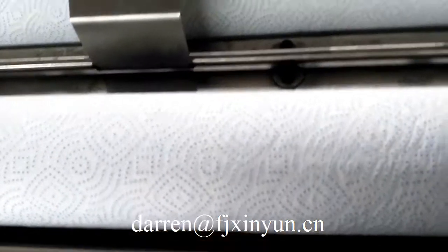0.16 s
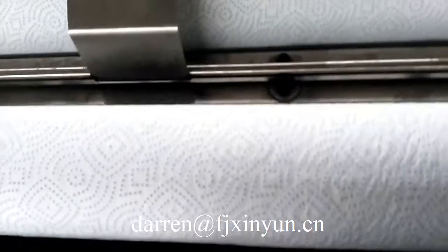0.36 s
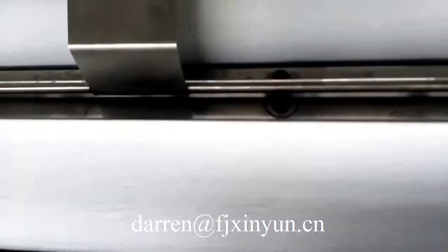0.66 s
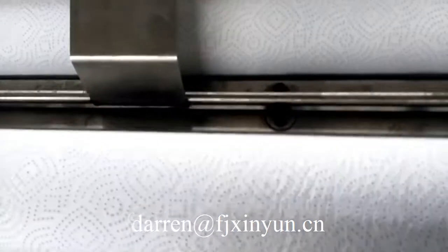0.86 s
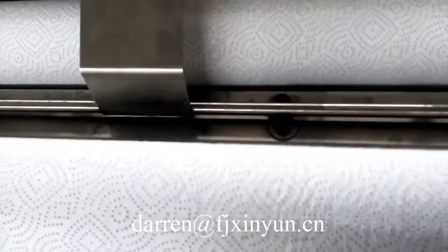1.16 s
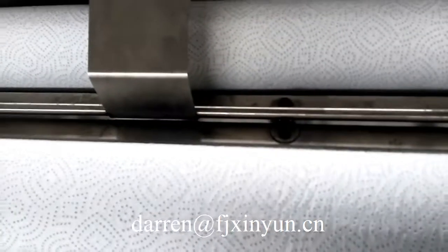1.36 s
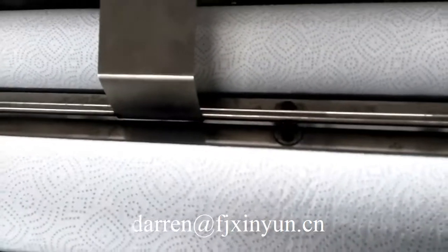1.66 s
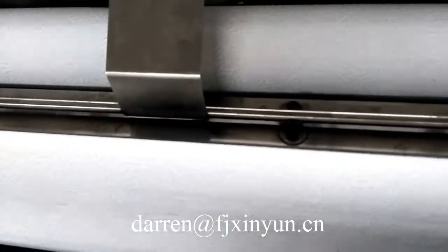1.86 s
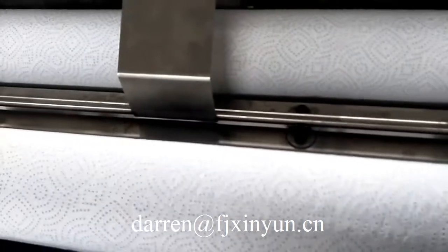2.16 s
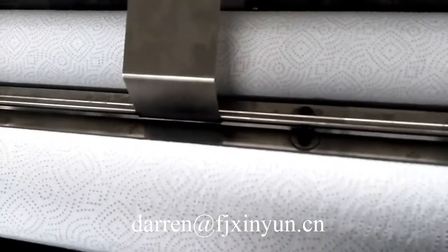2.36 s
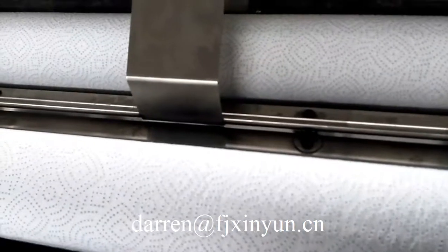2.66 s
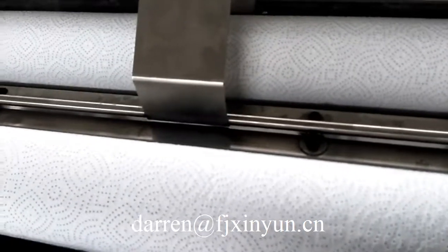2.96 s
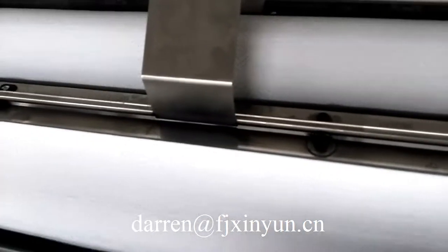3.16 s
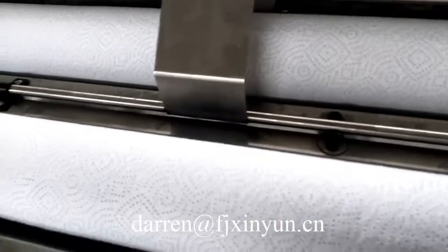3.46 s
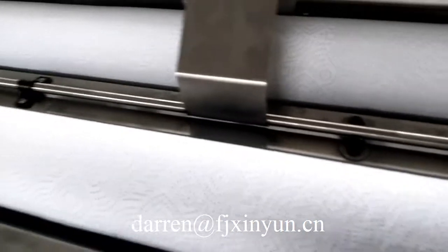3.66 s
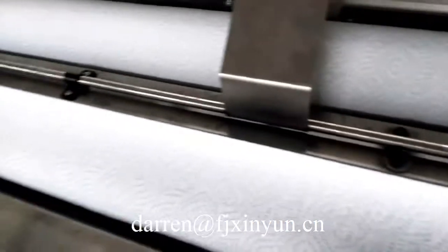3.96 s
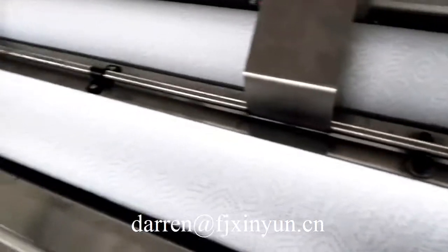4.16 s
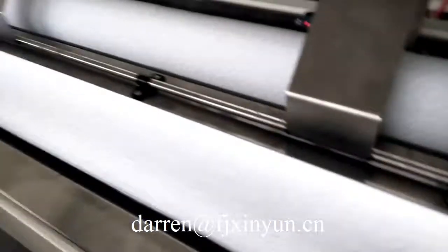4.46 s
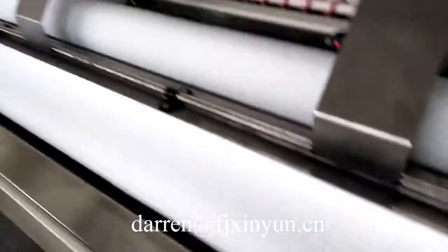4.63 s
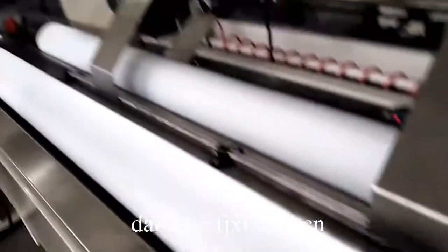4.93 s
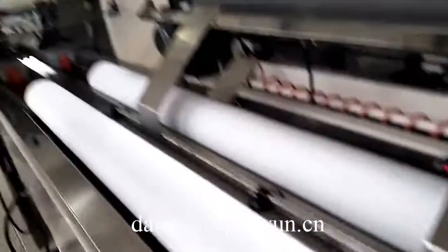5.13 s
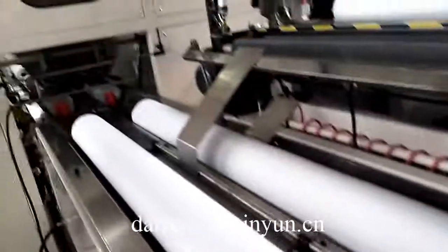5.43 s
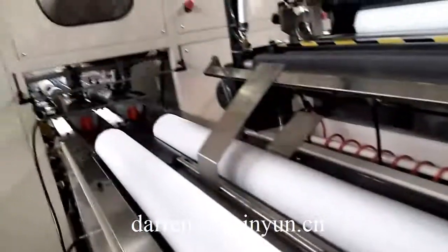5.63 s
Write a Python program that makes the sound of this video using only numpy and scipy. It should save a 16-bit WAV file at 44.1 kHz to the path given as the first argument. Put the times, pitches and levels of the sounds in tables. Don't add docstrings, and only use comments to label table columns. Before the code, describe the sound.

A tissue machine already runs at full speed at 0 s and never stops. Its thick, uneven roar combines low-mid frame rumble, roller noise, paper hiss and thin high air leaks. A low gear hum grows through the first 1.4 s, throbs nearly five times a second, stays strong until about 3.2 s, fades around 4.6 s and returns near 5 s; its octave surges irregularly. A harmonic-rich saw whine near 900 Hz flutters above, briefly slowing, dipping and softening around 0.5, 1.8, 3.0 and 4.3 s, with another cut beginning at about 5.6 s. Ticks, thuds and faint air puffs cycle just over five times a second, ticks growing clearer until 4.9 s, then receding. From about 5 s the hand-held stereo perspective turns brighter and airier, with less deep rumble. A roll clanks dully into a metal chute at 5.5 s, followed by two quick bounces at 5.63 and 5.68 s. The hall adds short reverberation; the loudest peaks slightly saturate.

```python
import sys
import numpy as np
from scipy import signal
from scipy.fft import rfft, irfft, next_fast_len
from scipy.io import wavfile
from scipy.ndimage import uniform_filter1d, map_coordinates

SR = 44100
rng = np.random.default_rng(int(sys.argv[2]) if len(sys.argv) > 2 else 0)


def pcm_store(signal):
    levels = np.round(np.clip(np.atleast_2d(signal), -1, 1) * 32767)
    wavfile.write(sys.argv[1], SR, levels.astype(np.int16).T)


def makeup_ratio(level_db):
    decades = np.asarray(level_db, float) / 20
    return 10 ** decades


N = 255339


def unit(x):
    return x / np.sqrt(np.mean(x ** 2) + 1e-20)


def along(points, hz):
    f, v = np.transpose(points)
    return np.interp(np.log(hz + 1), np.log(f + 1), v)


def curves(rows):
    s, *cols = np.transpose(rows)
    return [np.interp(np.arange(N) / SR, s, c) for c in cols]


def wobble(rate_hz):
    knots = rng.standard_normal(int(N * rate_hz / SR) + 4)
    return map_coordinates(knots, [np.arange(N) * rate_hz / SR])


def filtered(x, response):
    m = next_fast_len(N + SR // 4)
    return irfft(rfft(x, m) * response(np.fft.rfftfreq(m, 1 / SR)), m)[..., :N]


def peak(hz, width_hz):
    return lambda f: 1j * f * width_hz / (hz * hz - f * f + 1j * f * width_hz)


def facing(db, gain_db, late):
    # time in seconds, share turned 0-1.
    turning = [
        (0, 0),
        (.5, 0.14),
        (1.9, 0.2),
        (2.4, 0.43),
        (4.1, 0.36),
        (4.6, .55),
        (5.1, .65),
        (5.35, 0.92),
        (5.79, 0.94),
    ]
    return db + gain_db * np.clip(curves(turning)[0], 0, 1.2) ** late


def ports(pair):
    # frequency in Hz, left-right likeness -1 to 1.
    likeness = [(60, 0.88), (110, 0.88), (200, 0.92), (370, 0.86), (670, 0.29), (1230, -0.32),
                (2250, -0.21), (4120, -0.33), (7550, 0.23), (13800, 1)]

    def angle(hz):
        return np.arccos(np.clip(along(likeness, hz), -1, 1)) / 2

    mid, side = filtered(pair, lambda hz: np.array([np.cos(angle(hz)), np.sin(angle(hz))]))
    return np.array([mid + side, mid - side])


def rush(spectrum, patchy_db):
    z = signal.stft(rng.standard_normal((2, N)), nperseg=512)[2]
    field = uniform_filter1d(rng.standard_normal(z.shape[1:]), size=5, axis=0)
    field = uniform_filter1d(field, size=12, axis=1)
    pair = signal.istft(z * makeup_ratio(patchy_db * unit(field)), nperseg=512)[1][:, :N]
    return unit(filtered(pair, lambda hz: makeup_ratio(along(spectrum, hz))))


def roar():
    # frequency in Hz, density in dB per Hz.
    frame_spectrum = [(15, -60), (25, -56), (42, -22), (61, -7.5), (113, -8), (155, -4.5), (247, -3),
                      (310, -1.5), (358, -1.5), (518, -6), (632, -14), (750, -15.5), (980, -36),
                      (1650, -120)]
    roller_spectrum = [(350, -69), (600, -7.5), (733, -16), (825, -5), (900, 0), (969, -1), (1190, 0.5),
                       (1360, -8), (1700, -11), (2210, -15), (3740, -120)]
    web_spectrum = [(820, -3), (1400, -6.5), (2040, -8.5), (2700, 2), (3360, -7.5), (4560, -7.5),
                    (5540, -14.5), (5800, -33.5), (6470, -31), (6600, -40), (8580, -72), (14500, -120)]
    air_spectrum = [(3650, -35), (6200, -3.5), (6720, -12.5), (7000, -7.5), (8750, -3.5), (9490, -5),
                    (10300, -4.5), (10900, -14), (11500, -8), (11900, 2), (12400, -4.5), (13200, -35),
                    (13600, -6), (14300, -10)]

    frame_db = facing(db=-15, gain_db=-2.6, late=.39) + .8 * wobble(4) + .7 * wobble(17)
    frame = makeup_ratio(frame_db) * rush(frame_spectrum, patchy_db=3)
    bass = filtered(frame, lambda hz: 1 / (1 + (hz / 110) ** 4))
    frame = frame + (makeup_ratio(facing(db=.1, gain_db=-7, late=10)) - 1) * bass

    rollers_db = facing(db=-26, gain_db=7.3, late=1.1) + 1.2 * wobble(4) + .8 * wobble(9)
    rollers = makeup_ratio(rollers_db) * rush(roller_spectrum, patchy_db=2.2)
    web_db = facing(db=-22.5, gain_db=-4, late=1.75) + .6 * wobble(3) + .6 * wobble(7)
    web = makeup_ratio(web_db) * rush(web_spectrum, patchy_db=.8)
    air_db = facing(db=-34, gain_db=8, late=6.7) + .9 * wobble(4)
    air = makeup_ratio(air_db) * rush(air_spectrum, patchy_db=1.3)
    return frame + rollers + web + air


def drones():
    # frequency in Hz, width in Hz, level in dB.
    drives = [(299.2, 1.5, -28), (390, 16, -27), (506, 8, -31), (1147, 14, -38), (1269, 8, -41),
              (9038, 8, -52)]
    out = np.zeros((2, N))
    for hz, width_hz, db in drives:
        out += makeup_ratio(db) * unit(filtered(rng.standard_normal((2, N)), peak(hz, width_hz)))
    return out


def gearbox():
    # time in seconds, level in dB.
    hum = [(0, -45), (.3, -34.5), (.9, -27), (1.4, -20), (2.3, -20), (3.2, -21), (3.6, -29), (4.1, -32),
           (4.6, -50), (5.1, -28), (5.79, -26.5)]
    # time in seconds, level in dB.
    surges = [(.12, -20), (.5, -20), (.88, -17.5), (1.051, -23), (1.28, -18.5), (1.52, -29), (1.82, -20.5),
              (2.501, -45), (2.751, -23), (3.049, -15.5), (3.3, -20.5), (3.65, -21), (3.95, -15),
              (4.2, -24), (4.471, -21), (4.76, -22), (5.22, -16), (5.35, -24), (5.6, -23.5), (5.75, -21)]
    mesh_hz, twin_hz, twin_in_step_s = 159.03, 168.93, .013
    wheel_hz, wheel_peak_s, wheel_depth = 4.65, 1.195, .39
    octave_db, surge_s = -37.5, .11

    t = np.arange(N) / SR
    mesh_db, = curves(hum)
    throb = 1 + wheel_depth * np.cos(2 * np.pi * wheel_hz * (t - wheel_peak_s))
    mesh = throb * makeup_ratio(mesh_db + 4.5) * np.sin(2 * np.pi * mesh_hz * t + .25 * wobble(36))
    twin_cycles = mesh_hz * t + (twin_hz - mesh_hz) * (t - twin_in_step_s)
    twin = makeup_ratio(mesh_db - 5) * np.sin(2 * np.pi * twin_cycles)

    swell = makeup_ratio(octave_db) + sum(makeup_ratio(db) * np.exp(-((t - s) / surge_s) ** 2) for s, db in surges)
    octave = swell * makeup_ratio(2 + 1.94 * wobble(14)) * np.sin(4 * np.pi * mesh_hz * t + .5 * wobble(9))
    return mesh + twin + octave


def saw():
    # level in dB, swing in dB, loudest in seconds after the cut,
    # loss in the paper in dB.
    partials = [(-34, 1.5, .95, 0), (-38, 3.5, 1, 11), (-29, 4, 0.46, 8.5), (-38, 1.5, 0.71, 0.5),
                (-37, 0.5, 0.58, 14)]
    # loudest at in seconds, repeat in seconds, depth in dB,
    # difference between ports in dB.
    standing = [(7.4, 15, 3.5, -28), (3.7, 4.9, 2, -34), (1.26, 2.85, 1, -34.5), (5.56, 7.2, 2.5, -31.5),
                (1.8, 4.9, 4, -60)]
    # partial number, level in dB.
    whine_top = [(6, -56), (7, -60)]
    tooth_hz, teeth = 895.9, 48
    first_s, every_s, speed_lost = .498, 1.273, .046
    slowing_s, recovery_s = .195, .225
    shade_db, shade_at_s, shade_s = 8, .84, .1

    t = np.arange(N) / SR
    since_s = (t - first_s + every_s / 2) % every_s - every_s / 2
    load = np.clip(1 - np.abs(since_s) / np.where(since_s < 0, slowing_s, recovery_s), 0, 1)
    phase = 2 * np.pi * np.cumsum(tooth_hz * (1 - speed_lost * load)) / SR
    hidden_db = shade_db * np.exp(-((since_s % every_s - shade_at_s) / shade_s) ** 2)

    mid = sum(makeup_ratio(db - 8 * load + 3.5 * wobble(8)) * np.sin(k * phase) for k, db in whine_top)
    side = np.zeros(N)
    for k, (partial, wave) in enumerate(zip(partials, standing), start=1):
        db, swing_db, loudest_s, cut_db = partial
        best_s, repeat_s, depth_db, side_db = wave
        level_db = db + depth_db * np.cos(2 * np.pi * (t - best_s) / repeat_s)
        level_db = level_db + swing_db * np.cos(2 * np.pi * (since_s - loudest_s) / every_s)
        level_db = level_db - cut_db * load - (k == 3) * hidden_db
        runout = 1 + (.36 + .15 * wobble(4)) * np.sin(phase / teeth + 1.3 * k + .9 * wobble(5))
        flutter_db = 3 + .8 * wobble(7) + 2.5 * wobble(38)
        jitter = (.3 + 2.5 * load) * wobble(45)
        mid += runout * makeup_ratio(level_db + flutter_db) * np.sin(k * phase + jitter)
        echo = wobble(9) * np.sin(k * phase) + wobble(9) * np.cos(k * phase)
        side += makeup_ratio(side_db - 6 * load) * echo
    return np.array([mid + side, mid - side])


def contacts(rows, scatter_db, pushed, rise_s):
    turn_hz = 5.276
    turns_s = np.arange(int(N / SR * turn_hz) + 1) / turn_hz
    t = np.arange(SR // 8) / SR
    out = np.zeros((2, N))
    for s, hz, width_hz, t60_s, db in rows:
        train = np.zeros(N + SR)
        hits = np.round((turns_s + s) * SR).astype(int)
        train[hits] = makeup_ratio(scatter_db * rng.standard_normal(len(turns_s)))
        train = train[:N]
        decay = makeup_ratio(-60 * t / t60_s) * (1 - np.exp(-t / rise_s))
        shake = signal.fftconvolve(train, decay)[:N] * rng.standard_normal((2, N))
        resonance = peak(hz, width_hz)
        rung = filtered(shake + pushed * train, lambda f: resonance(f) ** 2)
        out += makeup_ratio(db) * np.sqrt(SR / width_hz / 2) * rung
    return out


def puffs():
    # time into the turn in seconds, frequency in Hz, width in Hz, t60 in seconds, level in dB.
    valves = [(.004, 12000, 506, 0.037, -19.5), (.018, 11400, 500, 0.066, -28.5),
              (.065, 12000, 500, 0.059, -25.5), (.097, 11400, 507, 0.044, -24),
              (.108, 11700, 503, 0.11, -27), (.143, 12200, 603, 0.088, -26),
              (.158, 12020, 500, 0.031, -19.5), (.140, 8480, 910, 0.22, -34.5),
              (.143, 10240, 600, 0.16, -33.5)]
    level_db = facing(db=.1, gain_db=15, late=15)
    return makeup_ratio(level_db) * contacts(valves, scatter_db=2, pushed=0, rise_s=.006)


def knocks():
    # time into the turn in seconds, frequency in Hz, width in Hz, t60 in seconds, level in dB.
    ticks = [
        (.044, 3050, 500, .015, -30),
        (.091, 2950, 400, 0.025, -22),
        (.138, 2880, 350, 0.02, -26),
        (.186, 3100, 400, 0.022, -22),
    ]
    thuds = [
        (.043, 2454, 380, 0.04, -21),
        (.051, 2380, 350, .06, -23),
    ]
    # time in seconds, level in dB.
    shaft_view = [(0, -2), (1, -1), (2, 2), (4, 4), (4.9, 6), (5.05, -5), (5.79, -7)]
    seen_db, = curves(shaft_view)
    seen = makeup_ratio(seen_db) * contacts(ticks, scatter_db=2, pushed=10, rise_s=.002)
    return seen + contacts(thuds, scatter_db=3, pushed=9, rise_s=.002)


def hall(x):
    # frequency in Hz, t60 in seconds.
    decay_times = [(200, 0.7), (2000, 0.44), (10000, 0.056)]
    hz, t, z = signal.stft(rng.standard_normal((2, SR // 2)), SR, nperseg=256)
    decay = makeup_ratio(-60 * t / along(decay_times, hz)[:, None])
    tail = signal.istft(z * decay, SR, nperseg=256)[1]
    return signal.fftconvolve(x, tail / np.linalg.norm(tail[0]), axes=1)[:, :N]


def clanks():
    # time in seconds, peak in dB, frequency in Hz.
    hits = [
        (5.517, -8.5, 886),
        (5.634, -13, 1160),
        (5.681, -9, 950),
    ]
    out = np.zeros((2, N + SR))
    t = np.arange(SR // 5) / SR
    for s, db, hz in hits:
        upper_phase = rng.uniform(0, 4.3, (2, 1))
        ring = np.sin(2 * np.pi * hz * t) + .96 * np.sin(2 * np.pi * 1.3 * hz * t + upper_phase)
        envelope = makeup_ratio(db - 2 - 60 * t / .07) * (1 - np.exp(-t / .001))
        start = round(s * SR)
        out[:, start:start + len(t)] += envelope * ring
    return out[:, :N]


def scene():
    diffuse = ports(roar() + drones() + puffs())
    ticking = knocks()
    return diffuse + gearbox() + saw() + ticking + makeup_ratio(-4) * hall(ticking) + clanks()


def squeezed(x):
    mid_side = np.array([x[0] + x[1], x[0] - x[1]]) / 2
    hz, t, z = signal.stft(mid_side, SR, "cosine", nperseg=4096, scaling="psd")
    bands_db = 3.5 * rng.standard_normal((len(hz) // 32 + 1, len(t)))
    bands_db = np.repeat(bands_db, 32, axis=0)[:len(hz)]
    turned_db = np.interp(t, np.arange(N) / SR, facing(db=-66, gain_db=4.5, late=5))
    finer_db = 65 * np.clip(1 - hz[:, None] / 5400, 0, 1)
    step = makeup_ratio(turned_db - 3 + bands_db - finer_db)
    z = z * np.round(np.abs(z) / step) * step / (np.abs(z) + 1e-20)
    mid, side = signal.istft(z, SR, "cosine", nperseg=4096, scaling="psd")[1][:, :N]
    return np.array([mid + side, mid - side])


def roll_off(x):
    return signal.sosfilt(signal.butter(12, 14410, fs=SR, output="sos"), x)


def record(dry):
    # frequency in Hz, left over right in dB.
    balance = [(60, 2), (100, 1), (180, 2.0), (310, 2), (530, 1.5), (910, -1), (1570, 5), (2700, 2),
               (4650, -1.5), (8020, 8.5), (13800, 3.5)]
    low_cut_hz = 28

    def sensitivity(hz):
        port_db = along(balance, hz) * np.array([[.5], [-.5]])
        return makeup_ratio(port_db) / (1 + (low_cut_hz / (hz + 1)) ** 4)

    x = filtered(dry, sensitivity)
    x = x + makeup_ratio(-39) * filtered(rng.standard_normal(x.shape), lambda hz: hz > 5000)
    x = x / (1 + np.abs(x / 1.05) ** 8) ** (1 / 8)
    mix = squeezed(x)
    return roll_off(mix)


dry = scene()
out = record(dry)
pcm_store(out)
```